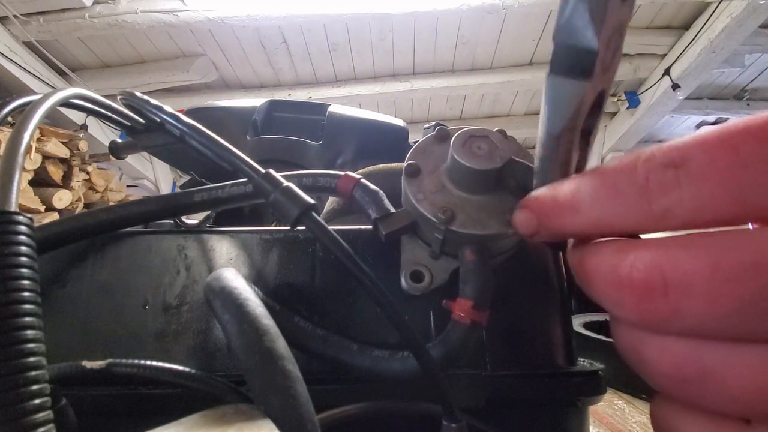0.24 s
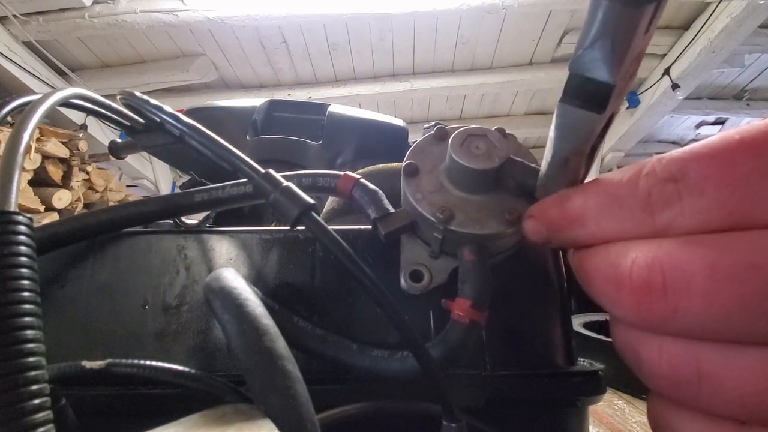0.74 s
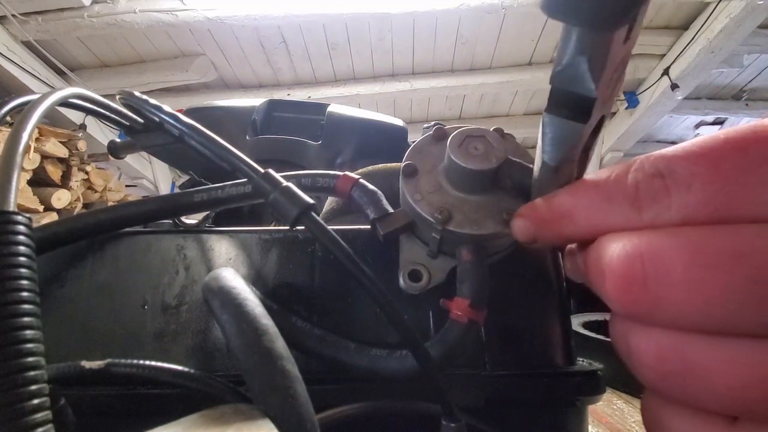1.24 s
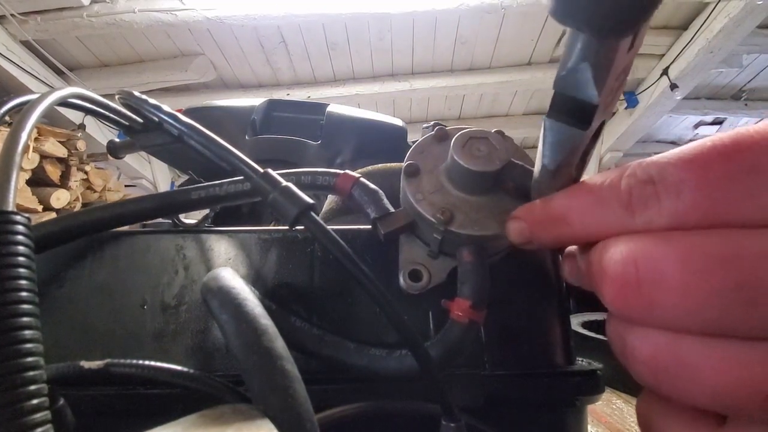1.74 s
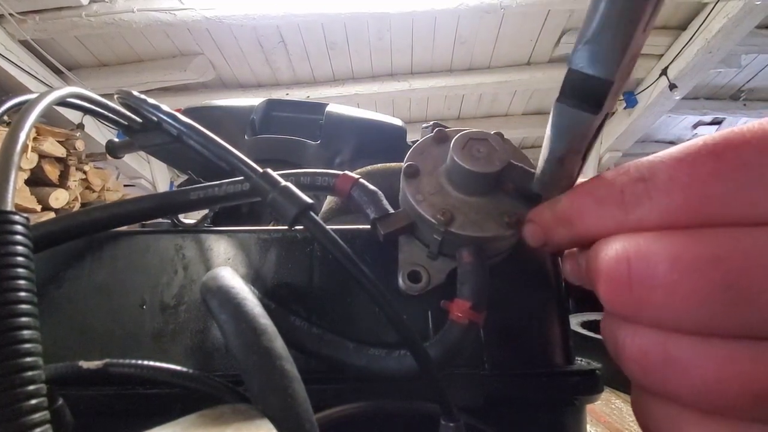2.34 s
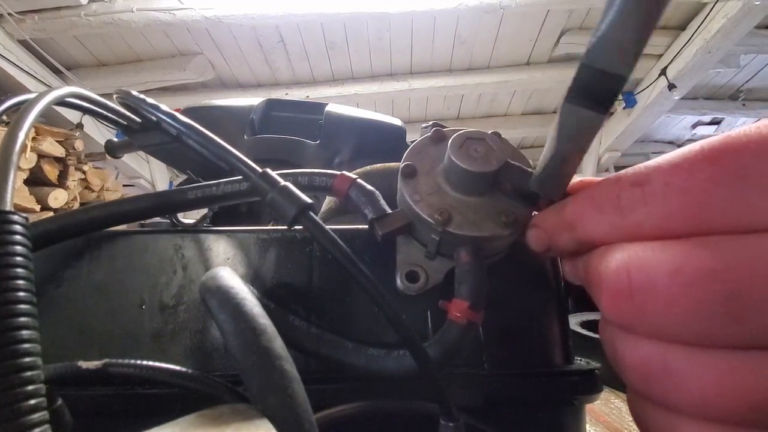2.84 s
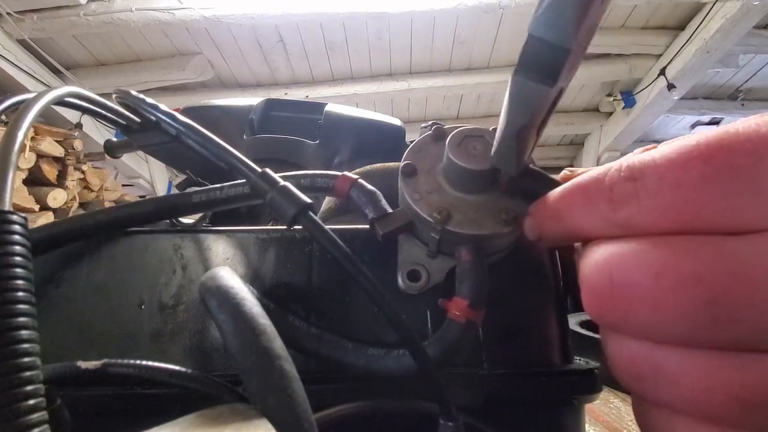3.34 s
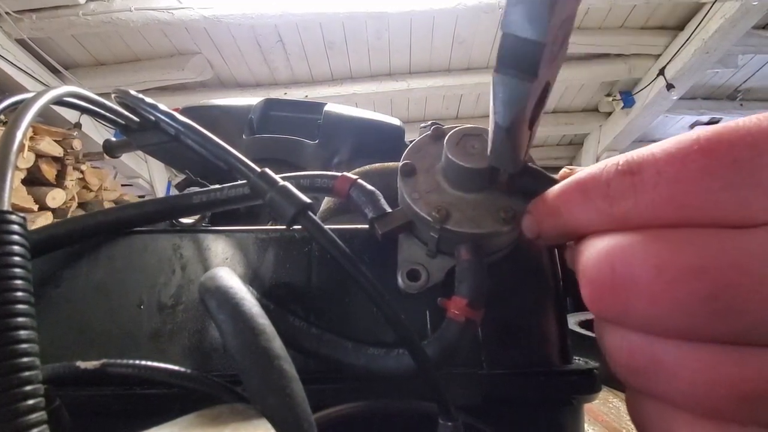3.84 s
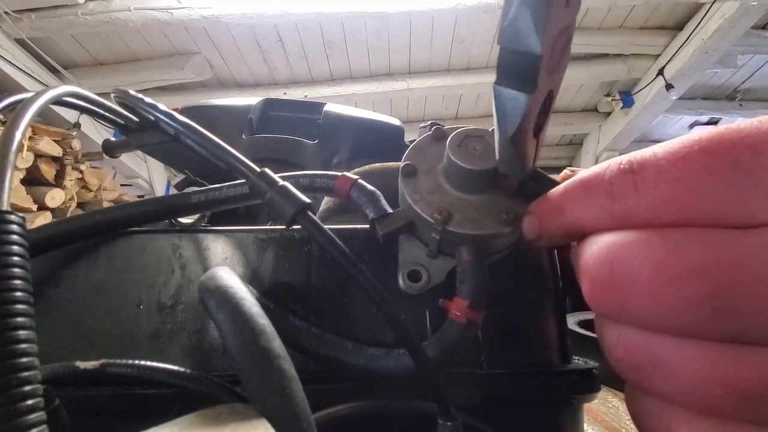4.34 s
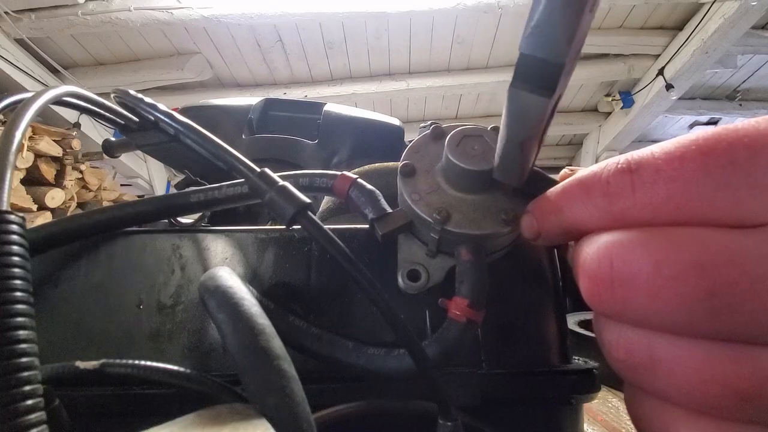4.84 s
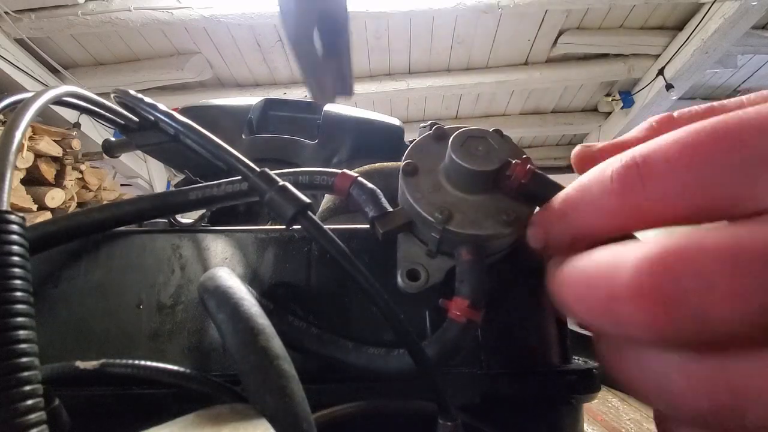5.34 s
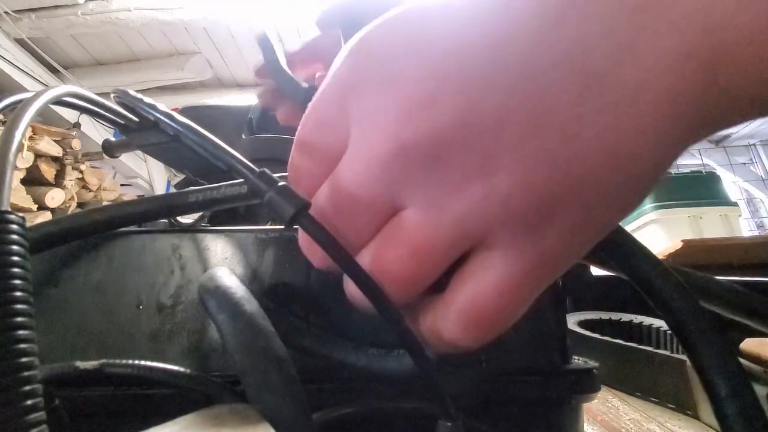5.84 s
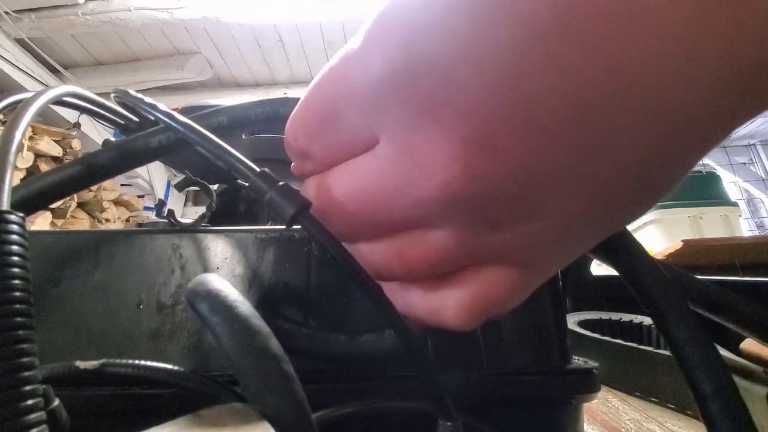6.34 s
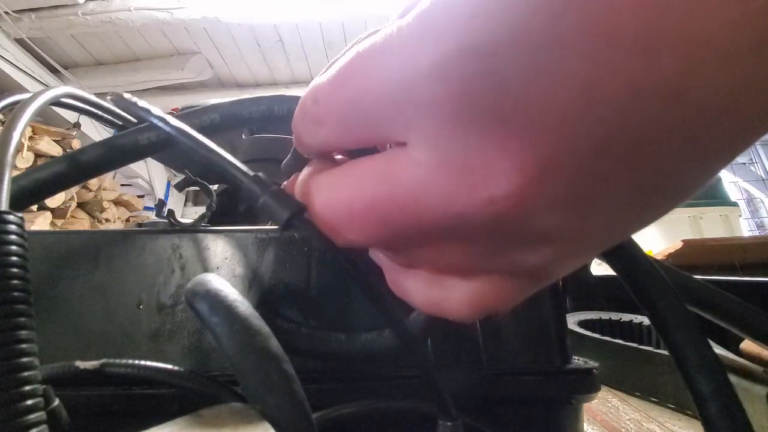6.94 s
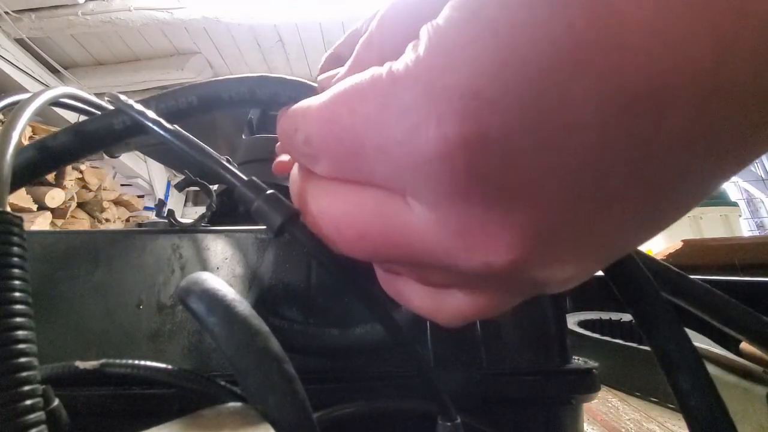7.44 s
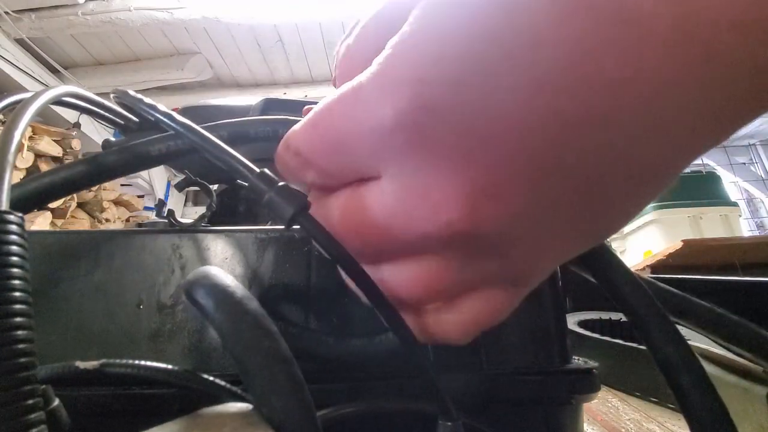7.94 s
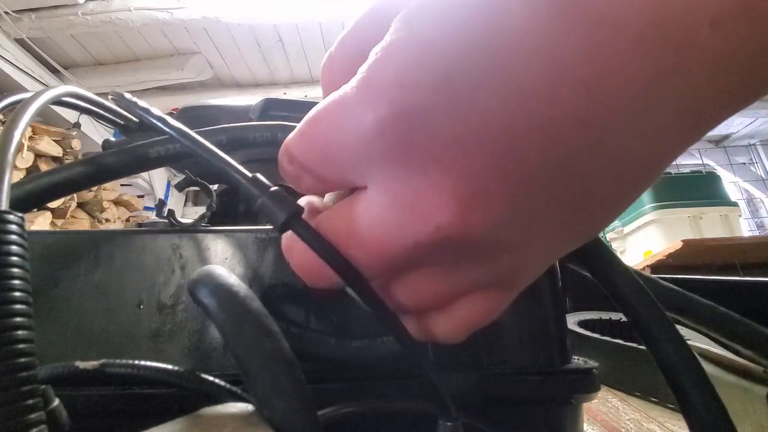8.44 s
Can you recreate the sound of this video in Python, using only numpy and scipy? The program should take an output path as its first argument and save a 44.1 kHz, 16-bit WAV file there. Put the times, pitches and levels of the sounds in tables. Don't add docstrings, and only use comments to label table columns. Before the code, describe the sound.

Close to a phone microphone in a small wooden shed, pliers and fingers work at a machine. A dull knock opens, light ticks and rubber scrapes follow, then a bright double metal snap, a heavy hollow thunk and another solid knock as the tool comes away. Afterwards only faint skin brushing and tiny ticks remain, until one last knock. Soft hiss and low rumble lie underneath.

```python
import sys
import numpy as np
from scipy import signal
from scipy.fft import rfft, irfft, next_fast_len
from scipy.io import wavfile
from scipy.ndimage import uniform_filter1d

SR = 44100
rng = np.random.default_rng(int(sys.argv[2]) if len(sys.argv) > 2 else 0)


def to_linear_factor(level_db):
    exponent = np.asarray(level_db, float) / 20
    return 10 ** exponent


def inscribe(sig):
    pcm = np.round(np.clip(np.atleast_2d(sig).T, -1, 1) * 32767)
    wavfile.write(sys.argv[1], SR, pcm.astype(np.int16))


N = 383669

# centre in Hz, width in Hz, level in dB.
PART_RINGS = [(2540, 160, 0), (3150, 2200, -15), (2780, 200, -1), (2300, 200, -9)]
# centre in Hz, width in Hz, level in dB.
UPPER_RINGS = [(4080, 330, 0), (4800, 500, -12), (3700, 300, -9), (4330, 200, -3)]
# centre in Hz, width in Hz, level in dB.
PORT_RINGS = [(6600, 450, -2), (6230, 1500, -10.5)]
PORT_PAN_DB = 8.5


def unit(x):
    return x / np.sqrt(np.mean(x ** 2))


def sides(pan_db):
    return to_linear_factor(np.array([pan_db, -pan_db]) / 2)[:, None]


def add(out, s, sound):
    i = max(int(s * SR), 0)
    out[:, i:i + sound.shape[1]] += sound[:, :N - i]


def bandpass(x, order, low_hz, high_hz):
    return signal.sosfilt(signal.butter(order, [low_hz, high_hz], "bandpass", fs=SR, output="sos"), x)


def decay(t, t60):
    return np.exp(-np.log(1000) * t / t60)


def resonate(x, modes):
    def ringing(v):
        total = 0
        for k, (hz, width, db) in enumerate(modes):
            b, a = signal.iirpeak(hz, hz / width, SR)
            total = total + (-1) ** k * to_linear_factor(db) * signal.lfilter(b, a, v)
        return total
    return ringing(x) / np.sqrt(np.sum(ringing(signal.unit_impulse(4096)) ** 2))


def coloured(points, likeness):
    size = 2 * next_fast_len(N // 2 + 1)
    log_hz = np.log(np.arange(size // 2 + 1) * SR / size + 1)

    def read(table):
        hz, value = np.transpose(table)
        return np.interp(log_hz, np.log(hz), value)

    mid, side = rfft(rng.standard_normal((2, size)))
    alike = np.clip(read(likeness), 0, 1)
    mid, side = mid * np.sqrt(1 + alike), side * np.sqrt(1 - alike)
    noise = irfft(to_linear_factor(read(points)) * np.array([mid + side, mid - side]), size)
    return unit(noise[:, :N])


def walk(rate):
    k = int(SR / rate)
    return uniform_filter1d(np.repeat(rng.standard_normal(N // k + 1), k), k)[:N]


def swells(rows, rest_db):
    t = np.arange(0, N / SR, .002)
    power = to_linear_factor(2 * rest_db)
    for s, db, rise, fade in rows:
        away = np.maximum((s - t) / rise, (t - s) / fade)
        power = power + to_linear_factor(2 * (db - 20 * away))
    return np.interp(np.arange(N) / SR, t, np.sqrt(power))


def floor():
    # frequency in Hz, level in dB per Hz.
    rumble_colour = [(22, -24), (38, -7), (55, 1), (85, -5), (125, -8.5), (200, -22.5), (400, -41),
                     (2000, -96.5)]
    # peak in seconds, level in dB, rise and fade over 20 dB in seconds.
    jolts = [(0.0, -50, 0.042, 0.22), (.55, -59, .45, 0.17), (.87, -57, 0.094, 0.073),
             (.99, -63, 0.11, 0.16), (1.11, -58.5, 0.13, 0.18), (1.5, -62, 0.37, 0.15),
             (1.65, -62, 0.049, 0.055), (1.98, -62.5, 0.53, 0.42), (2.15, -63, 0.041, .18),
             (2.34, -42.5, 0.065, 0.14), (2.64, -54, .12, 0.17), (2.91, -65, 0.035, .4),
             (3.17, -63, 0.1, .2), (3.41, -37, 0.06, 0.094), (3.8, -67.5, 0.19, 0.81),
             (4.09, -65, 0.64, .3), (4.53, -61, 0.35, 0.31), (4.89, -52.5, 0.057, 0.13),
             (5.09, -59, 0.19, 0.62), (5.27, -56, 0.28, 0.089), (5.61, -44, 0.05, 0.13),
             (5.97, -58, 0.17, 0.27), (6.3, -54.5, 0.082, 0.35), (6.62, -61.5, 0.14, 0.57),
             (7.0, -63.5, 0.23, 0.089), (7.15, -63, 0.36, 1.2), (7.92, -55, 0.052, 0.36),
             (8.38, -71.5, 0.17, .6), (8.56, -63, .1, 1.2)]
    # frequency in Hz, level in dB per Hz.
    heave_colour = [(15, -11), (30, 1), (45, -3), (70, -26.5), (200, -81)]
    # peak in seconds, level in dB, rise and fade over 20 dB in seconds.
    heaves = [(3.41, -47.5, 0.039, 0.1), (5.62, -48.5, 0.027, 0.17), (6.3, -52.5, 0.037, 0.39),
              (6.48, -60.5, 0.11, 0.21)]
    # frequency in Hz, level in dB per Hz.
    shed_air = [(70, -10), (120, 2.5), (250, -4.5), (500, -11), (800, -17.5), (1500, -19), (4000, -25)]
    # frequency in Hz, level in dB per Hz.
    hiss = [(5200, -30), (6900, -29.5), (7700, -34.5), (10000, -28), (13500, -22.5), (15600, -23),
            (16100, -60.5)]
    # frequency in Hz, left-right likeness from 0 to 1.
    air_likeness = [(60, 0.9), (130, 0), (290, 0.74), (640, 0.02), (1410, 0.2), (3100, 0), (6820, 0.3),
                    (15000, 0.6)]
    rest_db = -79.5
    frame_likeness = [(60, 0.93), (300, 1.0)]
    rumble = to_linear_factor(1.8) * coloured(rumble_colour, frame_likeness) * swells(jolts, rest_db)
    heaving = coloured(heave_colour, frame_likeness) * swells(heaves, rest_db - 19.5)
    return rumble + heaving + to_linear_factor(-75) * coloured(shed_air + hiss, air_likeness)


def ring(modes, rise_cycles, chance):
    lag_ms = np.array([[0], [0.27]])
    t = np.maximum(np.arange(SR // 5) / SR - lag_ms / 1000, 0)
    neighbours, scatter_db = .25, 4
    out = 0
    for (hz, db, t60, pan_db, way), c in zip(modes, chance):
        swell = (1 - np.exp(-t * hz / max(rise_cycles, .05))) ** 2 * decay(t, t60)
        main = np.sign(way) * np.sin(2 * np.pi * hz * (1 + 0.01 * c[0]) * t)
        under = c[2:4, None] * np.sin(2 * np.pi * hz * (.94 + 0.016 * c[4]) * t)
        over = c[5:7, None] * np.sin(2 * np.pi * hz * (1.6 + 0.014 * c[7]) * t)
        trio = main + neighbours * (under + over)
        out = out + to_linear_factor(db + scatter_db * c[1]) * sides(pan_db) * swell * trio
    return out / np.abs(out.mean(0)).max()


def shiver(noise, low_hz, high_hz, db, t60):
    t = np.arange(noise.shape[1]) / SR
    band = unit(bandpass(noise, 3, low_hz, high_hz))
    return to_linear_factor(db) * band * np.clip(t / .004, 0, 1) * decay(t, t60)


def knocks():
    # start in seconds, level in dB, boom and edge re level in dB,
    # left minus right in dB.
    padded = [(0.0, -17, -11, -14.5, 8), (0.44, -42, 4, -31, 4.5), (0.535, -43, -1, -34, 3.5),
              (0.735, -39, -5.5, -36, 7), (0.986, -37.5, -1.5, -35, 4.5), (1.106, -34.5, -2.5, -31.5, 6.5),
              (1.864, -28, -5, -22.5, 8), (2.617, -55, 8, -11, 3.5), (2.896, -65, 15, -26.5, 1),
              (3.114, -56, -3.5, -33, 3.5), (3.3978, -21.5, -12.5, -5.5, 10.5),
              (3.4009, -16.5, -7.5, -16.5, 9), (3.719, -47.5, 5, -37, 1), (3.982, -71.5, 15.5, -18, -1.5),
              (4.492, -37, -1, -27.5, 5), (4.882, -31.5, -7, -28, 6), (5.229, -15, -8, -17, 10),
              (5.907, -32.5, -4.5, -38.5, 5.5), (5.97, -49, 5.5, -20.5, 3.5), (7.917, -20.5, -5, -16, 5.5)]
    # start in seconds, level in dB, boom and edge re level # in dB, left minus
    # right in dB.
    more_knocks = [(.848, -52, -6, -4, 5), (3.379, -40, -1.5, -12, 4), (5.43, -59, -8, -15, 3),
                   (6.07, -59, -4, -20, 2), (6.97, -71, 9, -12, 2)]
    # start in seconds, level in dB, boom re level in dB,
    # left minus right in dB.
    taps = [(1.413, -74, 15.5, 1), (2.312, -33.5, 1, 4.5), (2.349, -27, -6, 3), (3.697, -66.5, -11.5, 13),
            (4.132, -56.5, -6.5, 2), (5.069, -58, 9.5, 5), (5.585, -58, 12.5, 0), (6.611, -68.5, 1.5, 14),
            (7.118, -55, -5.5, 0.5)]
    # frequency in Hz, level in dB, t60 in seconds,
    # left minus right in dB, way it moves at the blow (1 out, -1 in).
    boom_modes = [(136.8, -4.5, 0.21, -1.5, -1), (184.1, 2, 0.08, -3, -1), (258.5, -13.5, .08, 0, 1),
                  (326.7, -9.5, 0.11, -3.5, -1), (400.5, -11, .1, 0, 1)]
    # frequency in Hz, level in dB, t60 in seconds,
    # left minus right in dB, way it moves at the blow (1 out, -1 in).
    body_modes = [(318.4, -13.5, 0.099, -4, -1), (455.8, 0, 0.1, 3, 1), (571.6, -4, 0.14, -1.5, -1),
                  (640, -3, 0.089, 3.5, -1), (794.4, -3, 0.054, 12, 1), (720, -9, .02, 5.5, -1)]
    # frequency in Hz, level in dB, t60 in seconds,
    # left minus right in dB, way it moves at the blow (1 out, -1 in).
    edge_modes = [(925, -2, 0.064, -7.5, 1), (1000, -3, 0.048, -0.5, -1), (1197, -2.5, 0.072, 7, 1),
                  (1375, -10, 0.14, 2, -1), (1611.5, -7.5, 0.11, 1.5, 1), (1700, -13.5, 0.083, 2, -1)]
    # low edge in Hz, high edge in Hz, level in dB, t60 in seconds.
    panel_bands = [
        (250, 820, -20, .26),
        (1181, 3400, -5.5, 0.044),
        (810, 1800, -31, .22),
        (2000, 4900, -21.5, 0.076),
    ]
    tap_edge_db, frame_pan_db, own_share = -6.5, -3.5, .35

    bare = [(s, db, boom_db, tap_edge_db, pan_db) for s, db, boom_db, pan_db in taps]
    rows = sorted(padded + bare) + more_knocks
    frame = rng.standard_normal((3, 6, 8))
    frame[..., :2] = 0
    panels = rng.standard_normal((len(panel_bands), 2, SR // 5))
    chance = frame + own_share * rng.standard_normal((len(rows), 3, 6, 8))
    out = np.zeros((2, N))
    for (s, db, boom_db, edge_db, pan_db), c in zip(rows, chance):
        rise_cycles = .3 - .003 * db
        body = ring(body_modes, rise_cycles, c[0])
        body = body + to_linear_factor(edge_db) * ring(edge_modes, 1.3 * rise_cycles, c[1])
        noise = panels + 2 * own_share * rng.standard_normal(panels.shape)
        for band_noise, band, edge_share in zip(noise, panel_bands, [0, 1.4, 0.35, 1.1]):
            body = body + to_linear_factor(edge_share * edge_db) * shiver(band_noise, *band)
        alike = c[2][:, [0, 1, 2, 2, 4, 5, 5, 7]]
        boom = to_linear_factor(boom_db - 1.5) * ring(boom_modes, .55, alike)
        add(out, s - .0002, to_linear_factor(db + 1.5) * (sides(pan_db + frame_pan_db) * body + boom))
    return out


def port_edges():
    under = signal.butter(6, 7050, "low", fs=SR, output="sos")
    over = signal.butter(6, 7850, "high", fs=SR, output="sos")
    return under, over


def clicks():
    # start in seconds, energy in dB,
    # port ring and top re level in dB, left minus right in dB.
    snaps = [(0.0, -21, -5.5, -4.5, -10), (0.411, -34, -3, -19.5, 32), (0.4525, -36.5, -15, -17, 25),
             (0.8475, -15, 1, -11.5, 13.5), (1.7015, -44, 10, -3, 26), (2.3116, -10, 11, 4, 14.5),
             (2.3144, -12, -21, 10, 7), (2.3494, -7.5, 7, 3, 12.5), (2.379, -38, -4, 9, 14.5),
             (3.369, -42.5, -23, -17, -6), (3.398, -7, -32.5, -10, 5), (3.4097, -24.5, 1.5, -13.5, 13.5),
             (4.8747, -27.5, -27, -13.5, 2.5), (4.8794, -19, -6.5, -16.5, 10),
             (4.9005, -27.5, -7.5, -9.5, 7), (5.0728, -24.5, -9, -13.5, 10.5), (5.169, -35.5, 5, -14, 12.5),
             (5.2298, -20.5, -3, -16.5, 26), (7.9162, -21, -11, -19, 15)]
    # start in seconds, energy in dB, port ring
    # and top re level in dB.
    ticks = [(0.3717, -40.5, -3, -18.5), (0.419, -44, 0, -4), (0.5015, -48, -33, -12),
             (0.5686, -49, -30, -13), (0.5796, -57, -20, -15), (0.5953, -56, 6, 5),
             (0.6793, -46.5, -3, -13), (1.3042, -51, -19, -7), (1.4115, -42.5, -21.5, -31.5),
             (1.7808, -44.5, -3, -15), (1.8638, -49, -19.5, -14), (3.4349, -45, 3, -3.5),
             (4.4265, -53.5, -13.5, -7.5), (4.448, -54, 3, -11.5), (4.9799, -54, -8.5, -5.5),
             (5.1896, -46, -4, 13.5), (5.5093, -53, -3.5, 1), (5.907, -55.5, -13, -5.5),
             (6.1447, -53, -24, -12), (6.1968, -53.5, -16.5, -13), (6.305, -52.5, 7, -9.5),
             (6.42, -55.5, -15.5, 2), (6.6152, -49.5, 7.5, 14.5), (6.646, -49, 5, -8),
             (6.675, -50.5, -12.5, -20), (6.9208, -51, -6.5, -16), (7.1158, -55.5, 2, -17),
             (7.7268, -51.5, 0.5, 9.5), (7.775, -62, -2.7, 15), (7.8555, -52, -3, 6.5),
             (.378, -48, -1.5, -16), (.385, -47.5, -10, -15), (.3935, -53, -5, -16), (0.398, -57, 1, -12),
            (.4145, -45, -5, -11), (0.425, -49, -15, -15), (.4595, -55, -15, -17.5), (.47, -56, -15, -15),
            (.5375, -56, -13, -12), (.575, -60, 10, -10), (3.378, -44, -13, -14.5), (3.3855, -46, 1, -7.5),
            (3.4008, -22, -3.5, -5.5), (7.4312, -60, -5, 7), (7.45, -47.5, -10, -0.5),
            (7.7166, -62.5, -3, 9), (7.7999, -56.5, -11, -0.5)]
    # centre in Hz, width in Hz, level in dB.
    top_rings = [(9040, 6000, -4.5), (12700, 2600, -0.5), (15100, 560, -2), (14600, 630, 0)]
    chatter_ms, first_contact = 0.7, 4.8

    out, t = np.zeros((2, N)), np.arange(1024) / SR
    under, over = port_edges()

    def energy(v, db):
        return to_linear_factor(db) * unit(v) / np.sqrt(len(t))

    light = [(*row, 21 - 0.74 * row[3]) for row in ticks]
    rows = sorted(snaps + light)
    fade = np.exp(-1000 * t / chatter_ms) + .18 * np.exp(-t / 0.0042)
    for (s, db, port_db, top_db, pan_db), c in zip(rows, rng.standard_normal((len(rows), 3, 1024))):
        hz = 3640 + 39.5 * port_db
        chatter = c[0] + first_contact * (t == 0) + 0.044 * c[1:]
        burst = chatter * fade * sides(pan_db)
        wide = energy(bandpass(burst, 2, hz / 1.7, hz * 1.3), db - 1.0)
        upper = energy(resonate(burst, UPPER_RINGS), db - 9.0)
        soft_db = db - 9.5 - 3.3 * max(db + 41.5, 0)
        soft = energy(resonate(burst, PART_RINGS + UPPER_RINGS), soft_db)
        port = energy(sides(PORT_PAN_DB) * resonate(burst, PORT_RINGS), db + port_db - .5)
        top = energy(signal.sosfilt(over, resonate(burst, top_rings)), db + top_db - .5)
        add(out, s, top + signal.sosfilt(under, wide + upper + soft + port))
    return out


def shed(x):
    # centre in Hz, t60 in seconds, level in dB.
    echo_bands = [(149, .34, -16.5), (473, .32, -12), (1480, .17, -14), (4050, .21, -12.5),
                  (7900, .19, -15), (13656, .22, -13.5)]
    t, tail = np.arange(SR // 2) / SR, 0
    for hz, t60, db in echo_bands:
        mid, side = rng.standard_normal((2, len(t))) / np.sqrt(2)
        echoes = mid + min(hz / 900, 1) * side * [[1], [-1]]
        fade = decay(t, t60) + to_linear_factor(-24.5) * decay(t, 0.92 * t60)
        fade = fade * np.clip(t / 0.0078, 0, 1)
        band = bandpass(echoes, 2, hz / 1.8, min(hz * 1.8, 17000))
        tail = tail + to_linear_factor(db) * band * fade / np.sqrt(np.sum(fade ** 2))
    return signal.fftconvolve(x.mean(0)[None], tail, axes=1)[:, :N]


def rubs():
    # start in seconds, length in seconds, level in dB,
    # low and upper ring re level in dB.
    drags = [(0.155, 0.087, -74, 0, 2), (0.371, 0.07, -69.5, 5, -1.5), (0.45, 0.023, -61.5, -10, -26),
             (0.5, 0.032, -74, -5, -16), (0.565, 0.04, -66.5, 2, -26), (1.395, 0.079, -82, -5, 3.5),
             (2.296, 0.015, -74, 8, 11), (2.604, 0.036, -67, -1.5, 12), (2.632, 0.04, -69.5, 4, 6.5),
             (3.364, 0.031, -62, -9, 2), (4.125, 0.051, -78, 11.5, -1), (4.41, 0.04, -78, -4, -2.5),
             (4.854, 0.02, -80.5, -12, 4), (5.02, 0.055, -85, -9, 12), (5.163, 0.034, -68.5, 7, 4),
             (7.419, 0.11, -68, -6, 0.5), (7.842, 0.054, -69, -13.5, -3), (7.113, 0.053, -83.5, 18, 0),
             (7.712, 0.11, -92, -14, 11)]
    # start in seconds, length in seconds, level in dB,
    # top re level in dB.
    brushes = [(5.081, 0.099, -74.5, 0), (5.56, 0.077, -82.5, 4), (6.616, 0.13, -83, 4.5),
               (6.917, 0.15, -81, -2.5), (7.345, 0.055, -83.5, 6.5), (7.433, 0.096, -83, 13),
               (7.524, 0.078, -78.5, 12), (7.59, 0.12, -82, 4.5), (7.693, 0.2, -80, 4.5),
               (7.788, 0.045, -82, 5), (8.51, 0.069, -86, 10), (0.402, 0.17, -87.5, 4),
               (4.876, .12, -87, 9), (5.486, 0.47, -90, 6), (5.895, 0.66, -88, 5), (6.49, 0.56, -91, 7.5),
               (7.711, .04, -83, 13)]
    # centre in Hz, width in Hz, level in dB.
    hose_rings = [(1050, 130, 0.6), (550, 950, -6.5), (1660, 570, -11)]
    # centre in Hz, width in Hz, level in dB.
    fizz = [(9500, 2000, -7.5), (13400, 1500, -2), (15100, 1100, 2)]
    rub_pan_db, brush_low_db, brush_upper_db = 10, -3, 2.5

    parts, upper, port, top, hose = np.zeros((5, 2, N))
    under, over = port_edges()
    grain_db = 2.2 * rng.exponential(size=N) + 2.5 * walk(120)
    grain = unit(rng.standard_normal((2, N)) * to_linear_factor(grain_db))
    rows = [(s, length, db, -9 + .4 * upper_db, low_db, upper_db) for s, length, db, low_db, upper_db in drags]
    rows += [(*row, brush_low_db, brush_upper_db) for row in brushes]
    for s, length, db, top_db, low_db, upper_db in rows:
        i, n = int(s * SR), int(length * SR)
        stroke = np.sin(np.pi * (np.arange(n) / n) ** 0.6) ** 0.7
        drag = to_linear_factor(-5.0) * grain[:, i:i + n] * stroke * sides(rub_pan_db)
        add(parts, s, to_linear_factor(db) * drag)
        add(upper, s, to_linear_factor(db + upper_db - 1.5) * drag)
        add(port, s, to_linear_factor(db + upper_db / 2 - 7.5) * drag)
        add(top, s, to_linear_factor(db + top_db + 1.4) * drag)
        add(hose, s, to_linear_factor(db + low_db + 2.5) * drag)
    below = resonate(parts, PART_RINGS) + resonate(upper, UPPER_RINGS) + resonate(hose, hose_rings)
    below = below + sides(PORT_PAN_DB) * resonate(port, PORT_RINGS)
    return signal.sosfilt(over, resonate(top, fizz)) + signal.sosfilt(under, below)


def squeaks():
    # start in seconds, length in seconds, pitch in Hz, level in dB, left minus right in dB.
    notes_sung = [(1.303, .03, 3550, -77, 5), (5.168, .055, 960, -62, 3), (5.522, .014, 6800, -67, 8),
                  (5.187, .005, 10600, -57, 5)]
    out, waver = np.zeros((2, N)), walk(270)
    for s, length, hz, db, pan_db in notes_sung:
        i, n = int(s * SR), int(length * SR)
        pitch = hz * (1 + 0.022 * waver[i:i + n])
        note = np.sin(2 * np.pi * np.cumsum(pitch) / SR)
        level = to_linear_factor(db + 3.5 * waver[i - n:i]) * np.sin(np.pi * (np.arange(n) / n) ** .5)
        add(out, s, sides(pan_db) * level * note)
    return out


def scene():
    near = knocks() + clicks() + rubs() + squeaks()
    return near + shed(near) + floor()


def low_pass(x):
    return signal.sosfilt(signal.butter(12, 16590, fs=SR, output="sos"), x)


def record(dry):
    cut = signal.sosfilt(signal.cheby1(8, .5, 15750, fs=SR, output="sos"), dry)
    return low_pass(cut)


dry = scene()
out = record(dry)
inscribe(out)
```